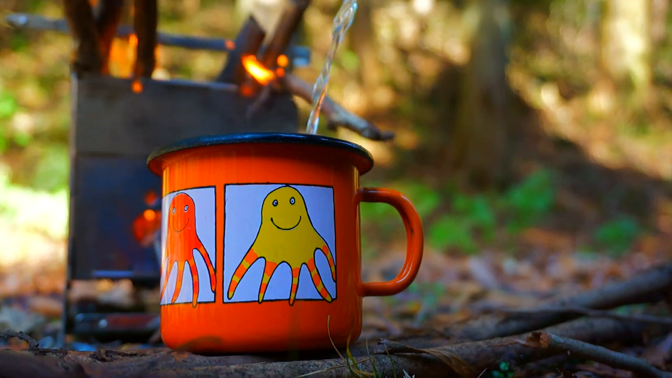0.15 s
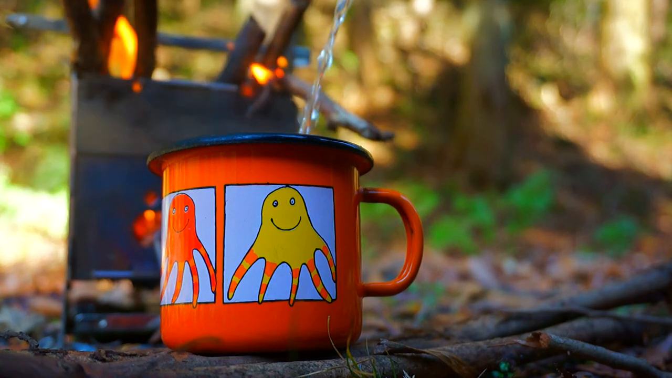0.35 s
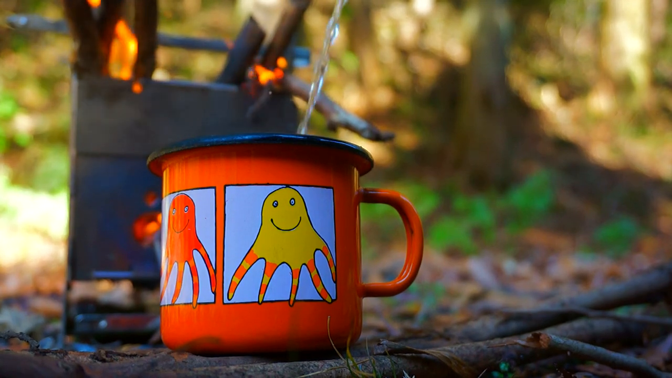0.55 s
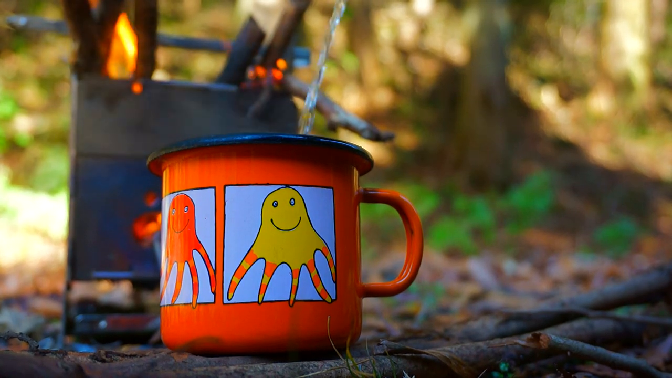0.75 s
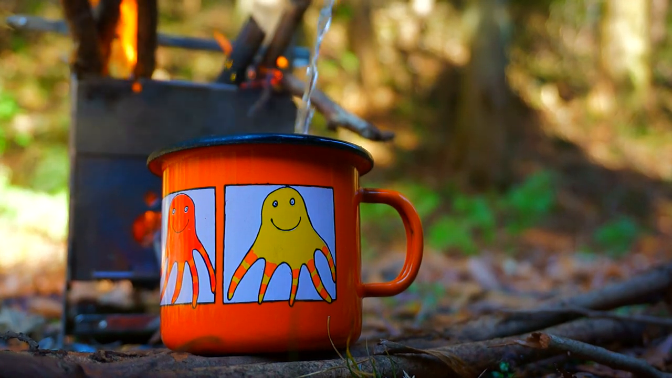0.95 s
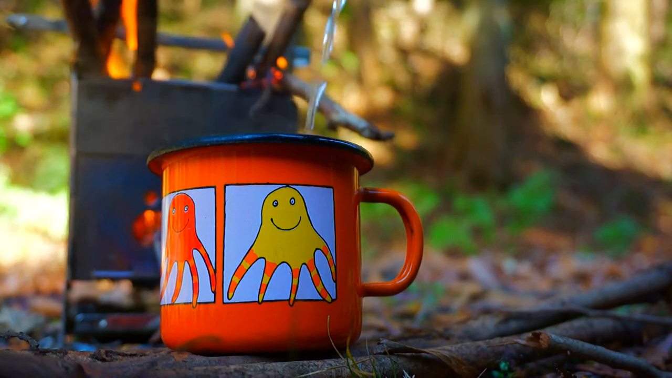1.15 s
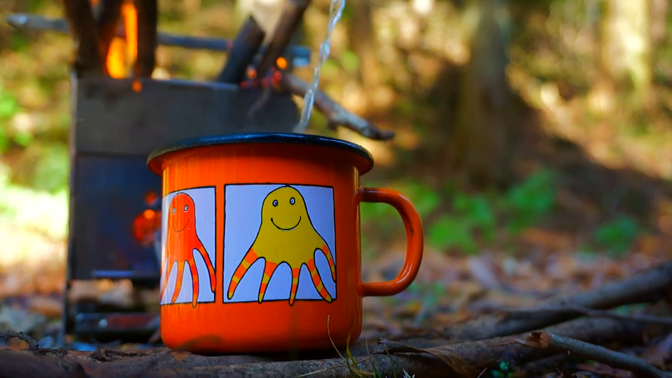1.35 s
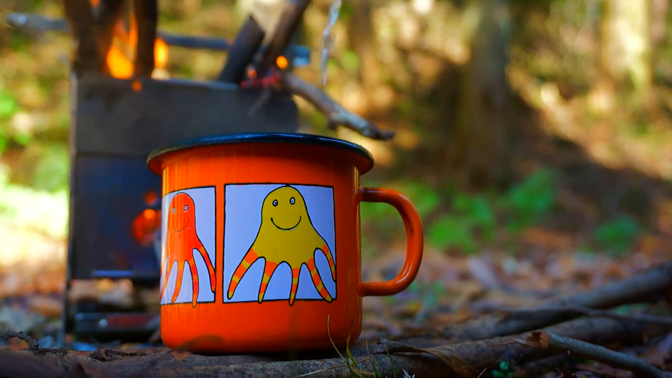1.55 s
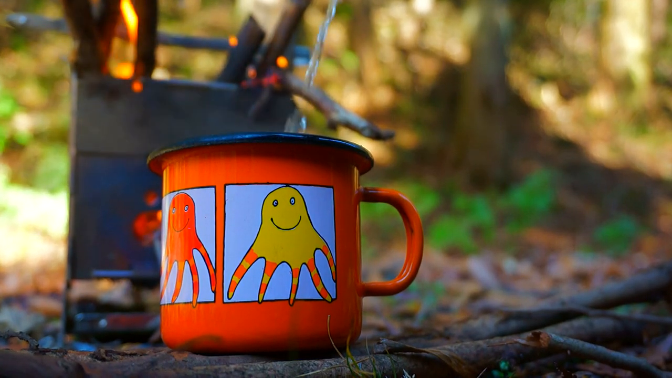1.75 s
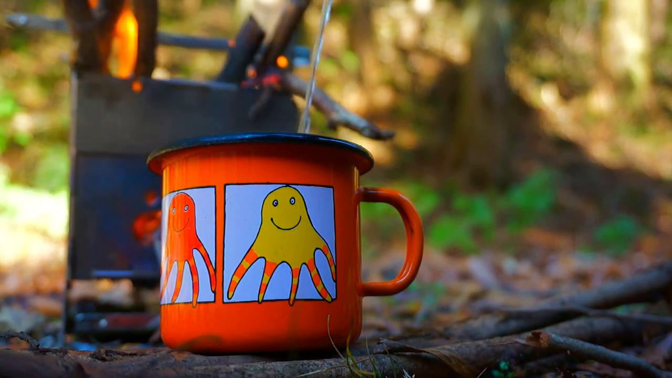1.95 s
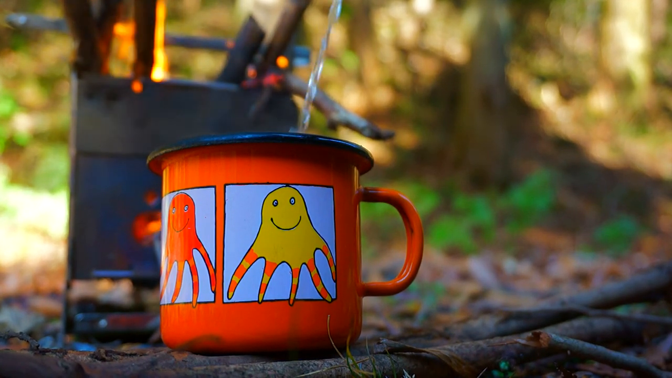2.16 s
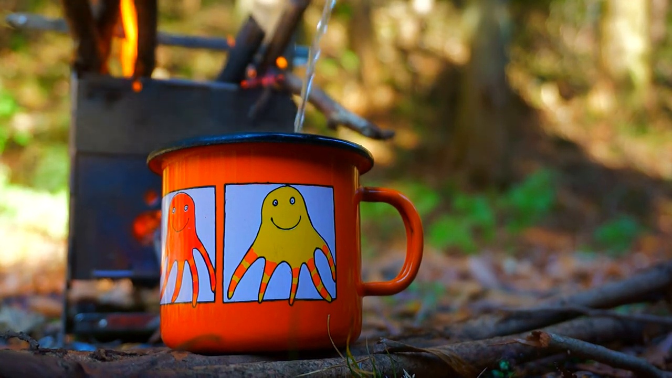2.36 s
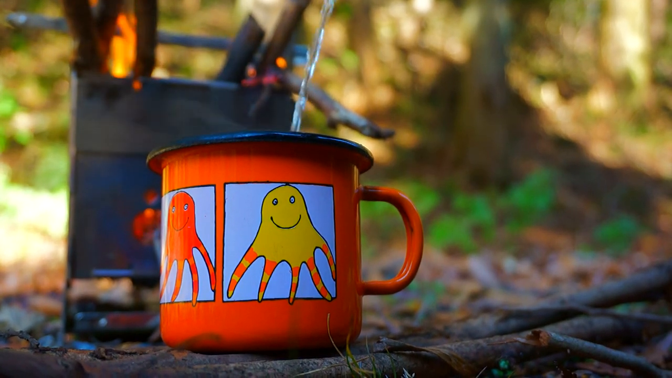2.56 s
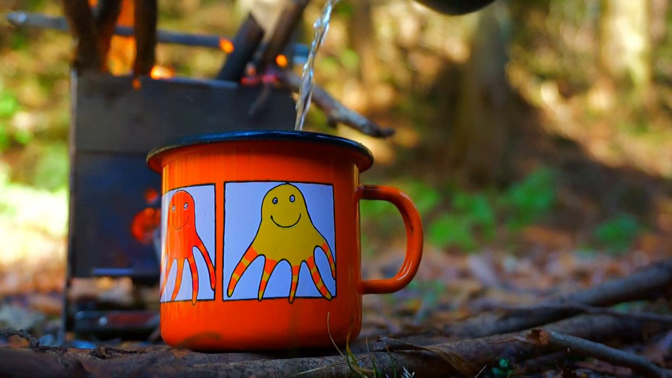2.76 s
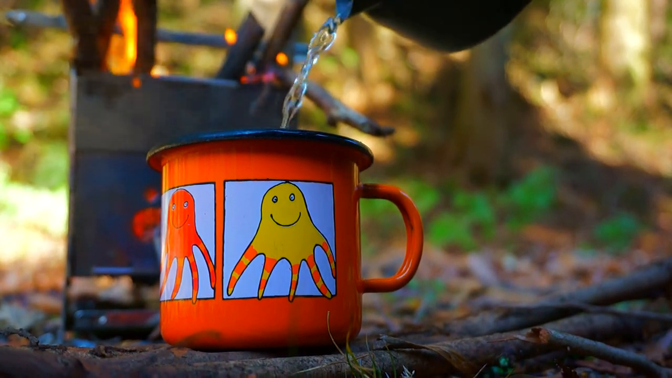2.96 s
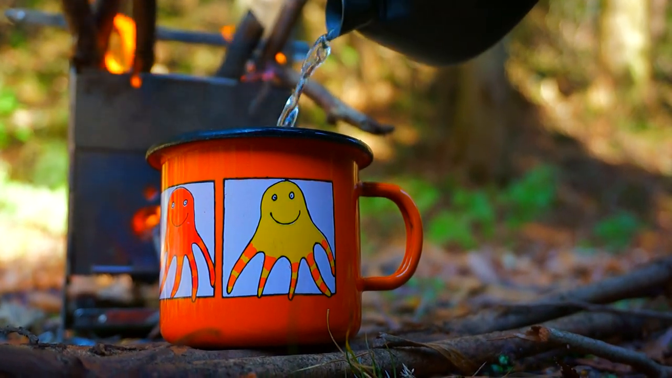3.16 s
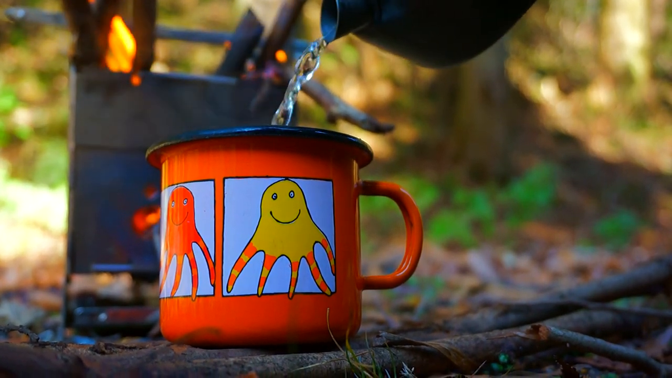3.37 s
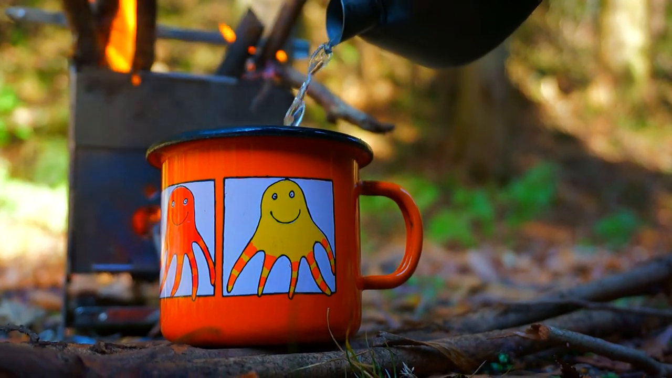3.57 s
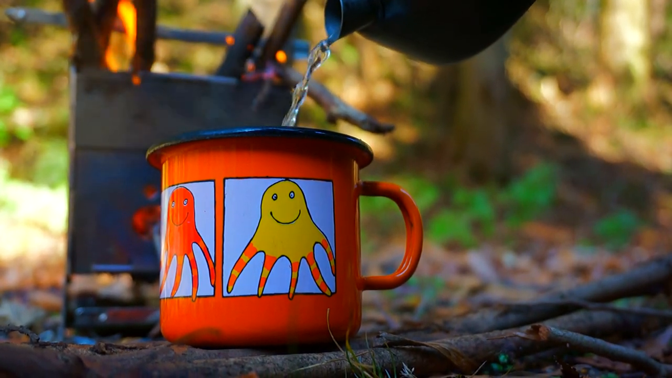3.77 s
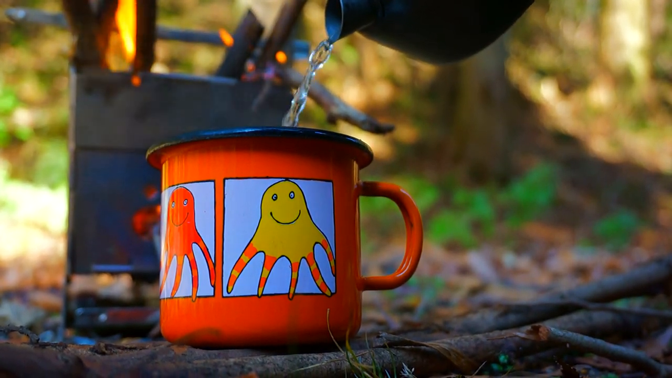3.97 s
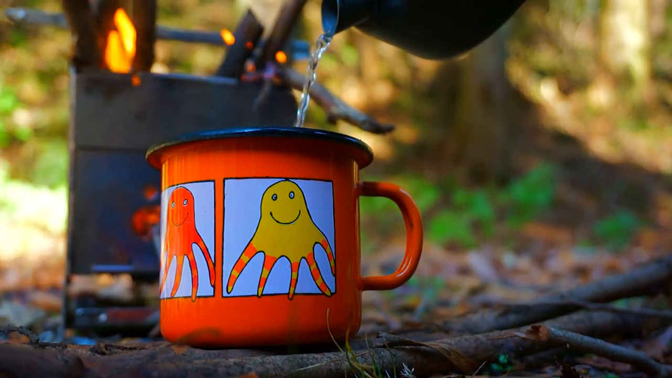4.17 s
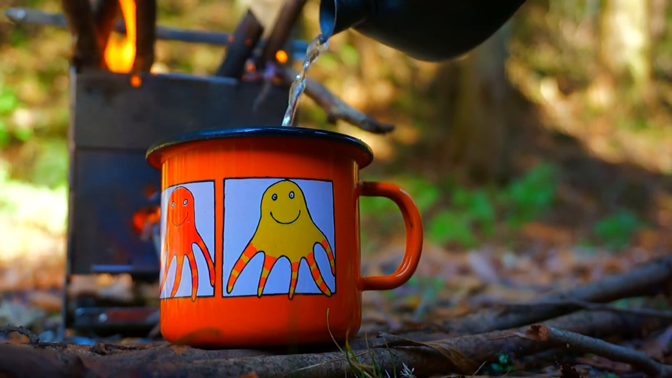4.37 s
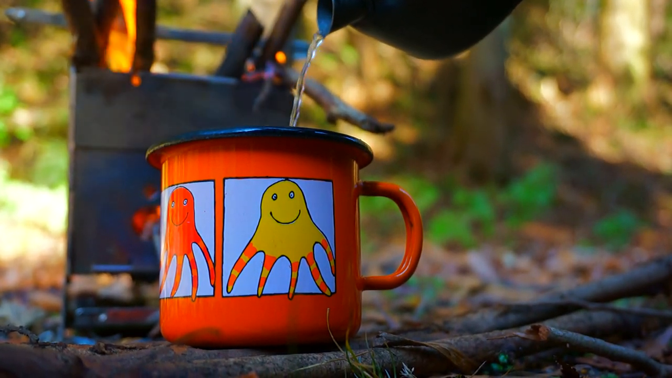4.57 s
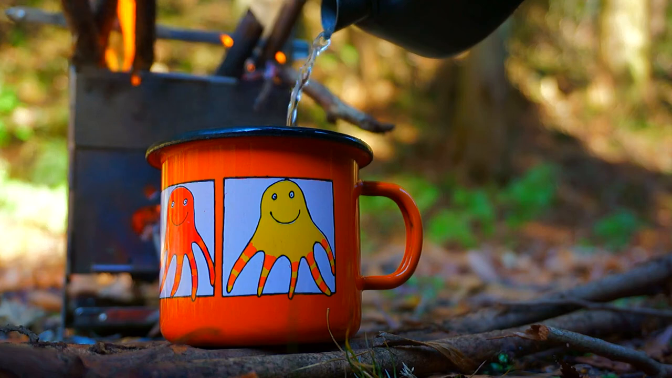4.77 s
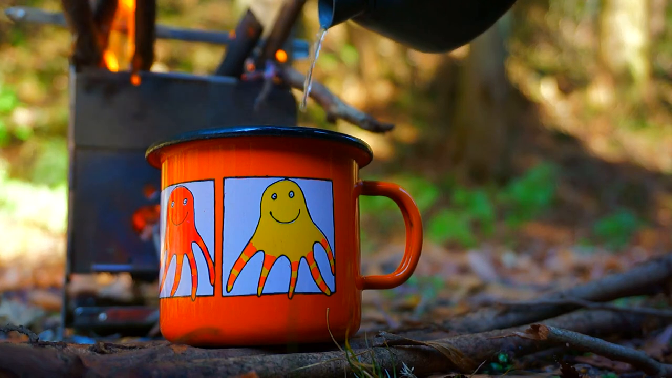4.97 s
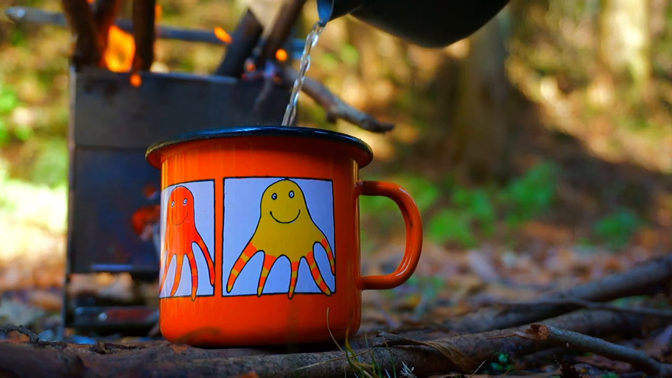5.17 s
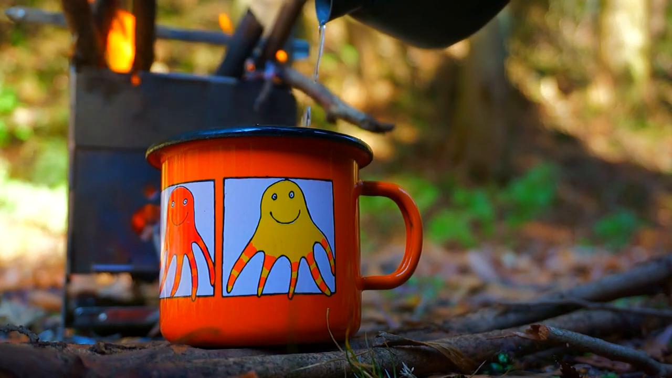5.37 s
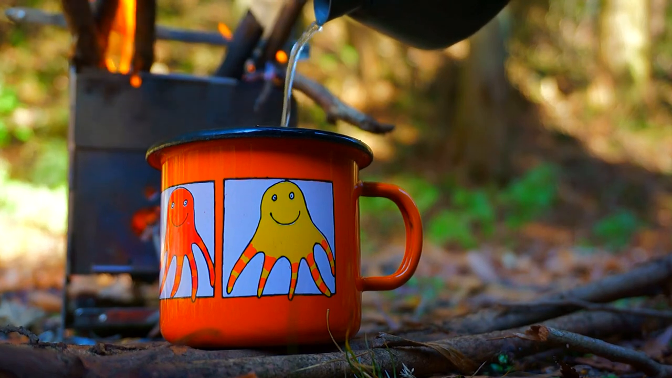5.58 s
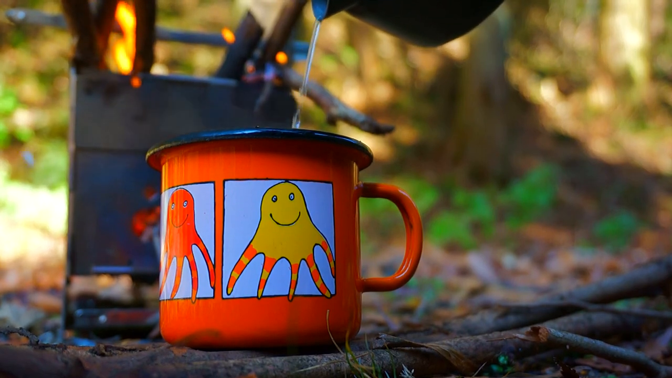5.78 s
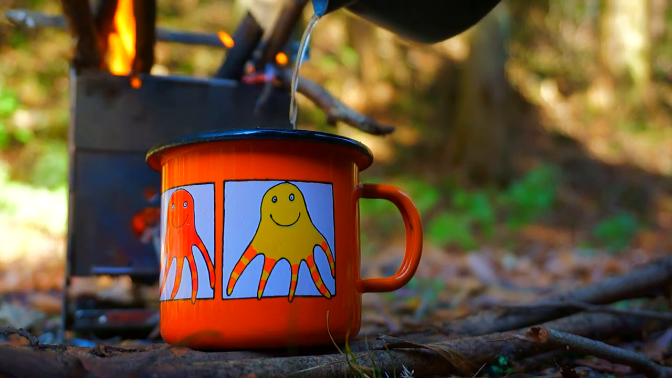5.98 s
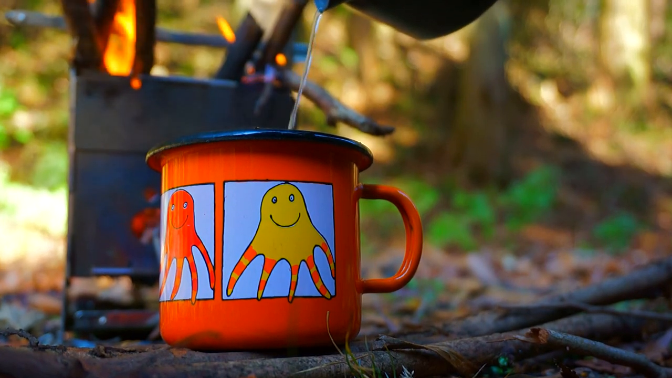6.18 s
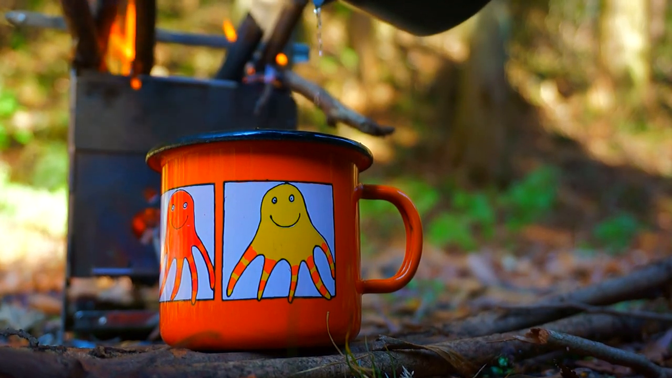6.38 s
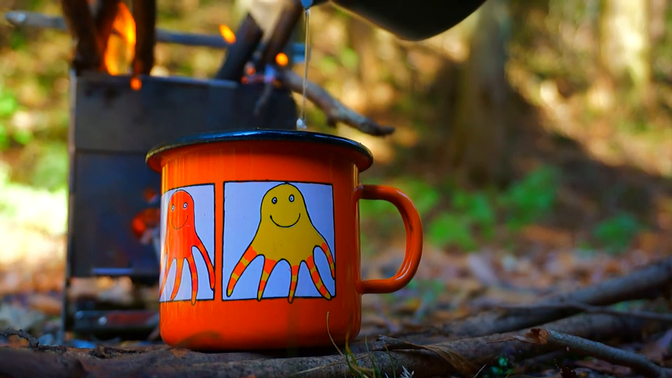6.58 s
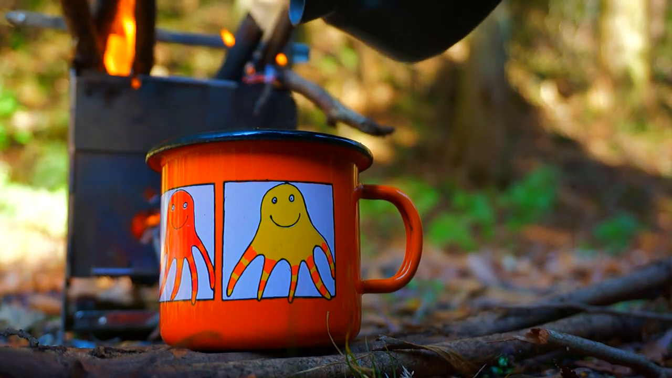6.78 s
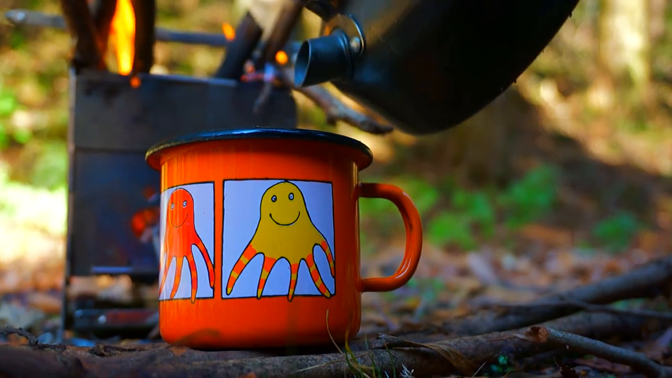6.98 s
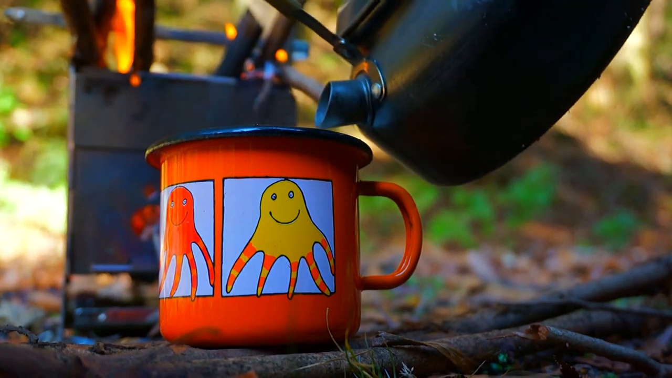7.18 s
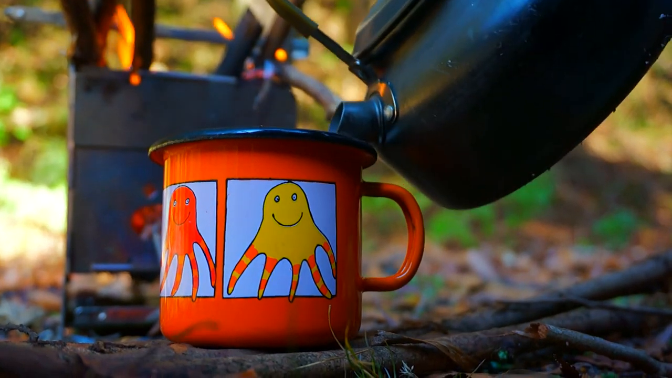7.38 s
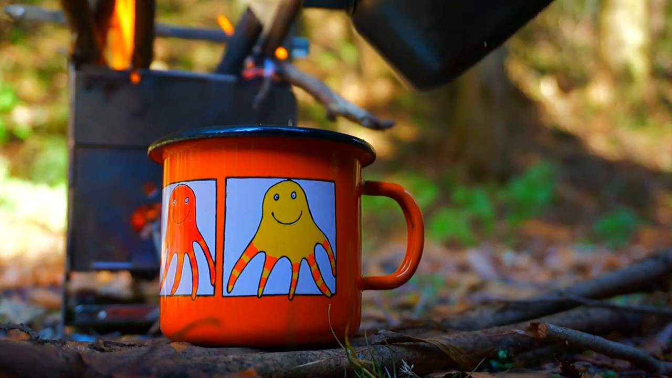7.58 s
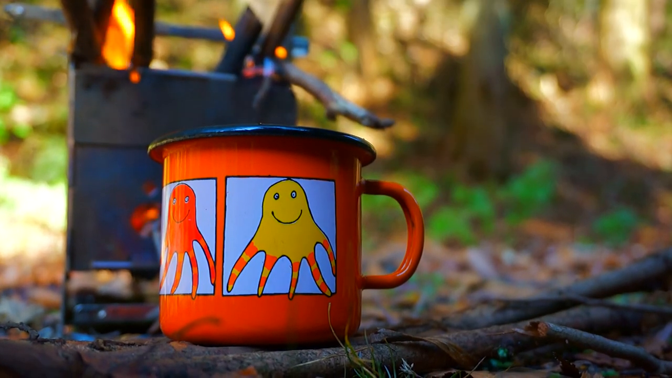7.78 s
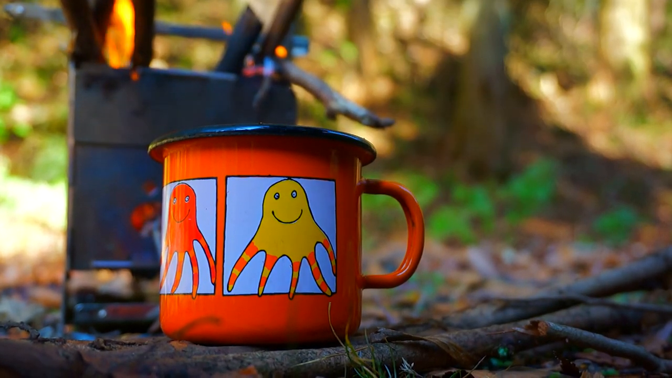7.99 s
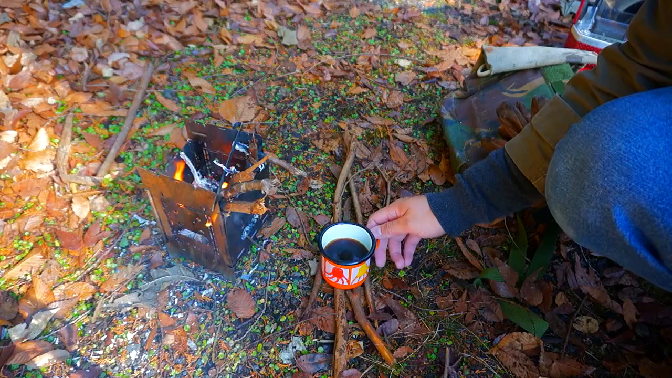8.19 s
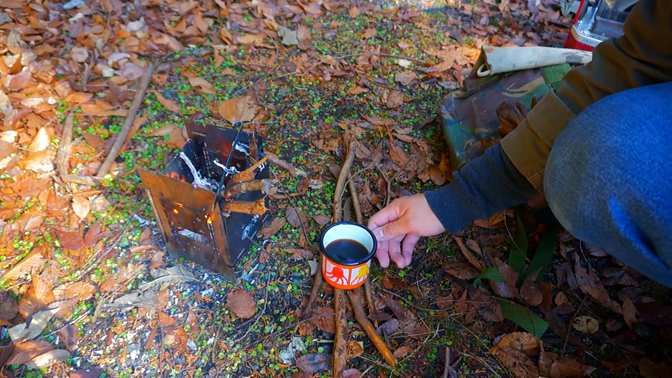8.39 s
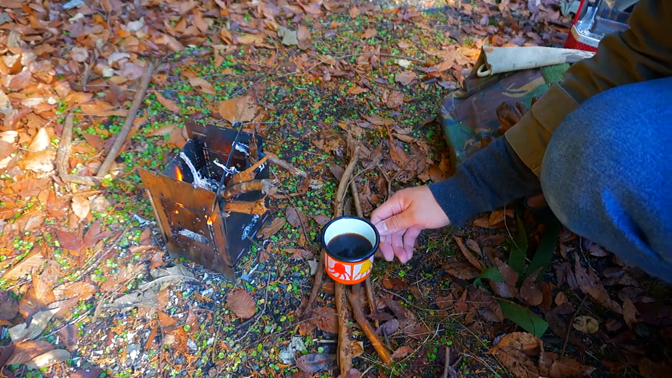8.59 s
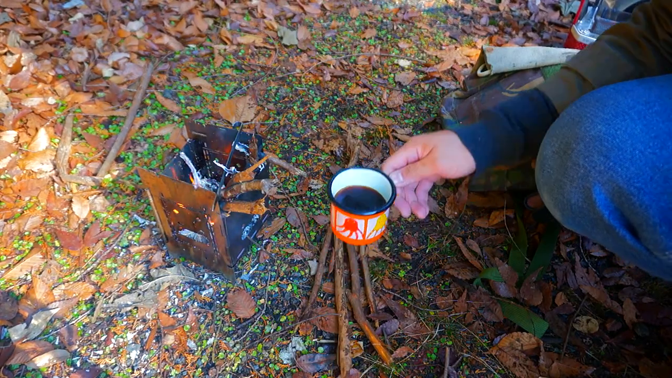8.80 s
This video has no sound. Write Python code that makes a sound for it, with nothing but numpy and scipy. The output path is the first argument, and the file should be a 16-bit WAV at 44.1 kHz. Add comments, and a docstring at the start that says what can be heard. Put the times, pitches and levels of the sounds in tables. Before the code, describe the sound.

From the start, hot water runs into an enamel mug, heard close and slightly left: dense irregular gurgles, hollow plops and bright splashing droplets with a fine hiss. It is fullest until about 3 s, then softer and finer, with bubbles rising in pitch as the mug fills. Low dull bumps occur around 3.2 to 3.9 s. From 4.5 s the stream thins, breaking briefly near 5.1 s into trickles and separate, purer drops until 6.8 s. Faint hollow tones swell in the late trickle and after it. At 7.4 s the spout knocks the rim once, a short clank with a beating metallic ring that lingers toward 8 s. Sparse wood-fire cracks come near 5.4, 6.2 and 8 s over a low, wide outdoor murmur. At 8.2 s the sound cuts abruptly to quieter air, with a soft grainy rustle peaking around 8.4 s and fading.

```python
"""Hot water runs from a kettle into an enamel mug beside a small wood stove in a forest.
Each trapped bubble is a short push that rings the air in the mug; droplets are noise bursts in the same mug.
The stream thins out; hollow notes near 1.3 kHz swell in noise, and the spout knocks once in beating modes.
Fire cracks, soft bumps and shaped noise for stove and open air lie around it.
Near the end the scene changes abruptly to a quieter spot with a soft, grainy rustle of noise."""
import sys
import numpy as np
from scipy import signal
from scipy.fft import rfft, irfft
from scipy.io import wavfile

SR = 44100
rng = np.random.default_rng(int(sys.argv[2]) if len(sys.argv) > 2 else 0)


def transcribe(u):
    """Save the signal u as a 16-bit wav file named by the first command-line argument.

    u: samples, shape (n,) or (channels, n), limited to [-1, 1]; the rate is SR.
    q: integer samples, one column per channel.
    """
    v = np.clip(np.atleast_2d(u).T, -1, 1)
    q = np.round(v * 32767).astype(np.int16)
    wavfile.write(sys.argv[1], SR, q)


N = 389835
T = np.arange(N) / SR
CLANK_AT, CHANGE_AT = 7.3987, 8.222  # s: the spout knocks; the second scene takes over

# The largest bubbles. Each row: start in seconds, level in dB (rms over 10 ms), pitch in Hz.
LARGE_BUBBLES = [(0.082, -36.5, 2200), (0.2403, -29, 1630.0), (0.2919, -32.0, 1370), (0.318, -34.5, 1960.0),
                 (0.3789, -35.5, 546), (0.3975, -30.5, 928), (0.423, -31.5, 620.0), (0.4973, -32.5, 970),
                 (0.5166, -26.0, 1240), (0.5324, -38, 1010), (0.5505, -24.5, 784), (0.5996, -29.5, 910),
                 (0.6204, -38, 875), (0.6357, -27, 915), (0.6702, -33, 765), (0.7154, -32.0, 2000),
                 (0.7361, -29.0, 710), (0.7882, -29.5, 667), (0.8006, -33.5, 770.0), (0.8305, -36.5, 2010),
                 (0.898, -37.5, 770.0), (0.9993, -30.5, 532), (1.0798, -30.0, 843), (1.1369, -28, 767),
                 (1.1761, -31.5, 1650), (1.195, -34.5, 1820.0), (1.2502, -34.0, 1060.0),
                 (1.3099, -30.5, 766), (1.3266, -34.5, 664), (1.4219, -24, 1210), (1.443, -30.5, 840),
                 (1.4508, -29.5, 1050), (1.484, -29, 1720), (1.5104, -29.0, 682), (1.565, -28, 1220),
                 (1.587, -35.5, 1390), (1.6331, -33, 1380), (1.664, -32.5, 1350), (1.6818, -35, 2160),
                 (1.7819, -34.5, 800.0), (1.7948, -34, 1070), (1.8189, -37, 950.0), (1.8283, -37, 900),
                 (1.8401, -29.5, 1010), (1.9406, -34.5, 597), (1.9825, -24.5, 396), (2.0155, -34, 450.0),
                 (2.0784, -30, 656), (2.146, -30.5, 736), (2.198, -31.5, 745), (2.2184, -29.5, 1060.0),
                 (2.267, -35, 1127), (2.2925, -34.5, 960), (2.484, -33, 790), (2.5234, -29.5, 1420),
                 (2.588, -37, 720.0), (2.6074, -36, 1690.0), (2.6391, -33.0, 760), (2.6872, -32.5, 1570),
                 (2.7044, -33.5, 2820), (2.714, -39, 2600.0), (2.7286, -31.5, 2020), (2.7392, -25.5, 890),
                 (2.8473, -28, 774), (2.8626, -29, 1350), (2.9219, -32, 760), (2.9392, -34, 1150),
                 (2.9637, -38, 1620), (3.0569, -35, 840), (3.2318, -39.5, 377), (3.3988, -36, 1660),
                 (3.5272, -34, 1310), (3.7675, -44.5, 1880), (3.836, -34.0, 1700), (3.8877, -37.5, 1520.0),
                 (3.899, -39.5, 1240), (3.9195, -33, 1020), (3.9467, -43, 1280), (3.9666, -38.5, 1810),
                 (4.0373, -40.5, 1760.0), (4.0542, -38, 1580.0), (4.1627, -39.5, 1660),
                 (4.209, -37.5, 2780), (4.2344, -38.5, 2030.0), (4.2833, -31.5, 1810),
                 (4.3055, -35.0, 2240), (4.3181, -43.5, 2880), (4.3674, -39.5, 1090), (4.3899, -37, 1660),
                 (4.433, -36.5, 1700), (4.497, -33.5, 790), (4.5421, -36, 1066), (4.5869, -36.5, 1740),
                 (4.6112, -37, 2300), (4.6793, -31, 1630.0), (4.7025, -31, 1840), (4.7414, -40, 1053),
                 (4.7654, -34, 1170), (4.7852, -42.5, 1530), (4.8681, -41, 1110), (4.883, -41.5, 1690.0),
                 (4.9298, -40.5, 1370.0), (4.9826, -40.5, 860.0), (5.0685, -39.5, 980), (5.0972, -44, 1114),
                 (5.122, -44, 1680), (5.2414, -46, 1270), (5.2938, -42.5, 1400), (5.3508, -41.5, 1240),
                 (5.401, -43.5, 1130), (5.4269, -43.5, 1430), (5.4456, -38.0, 1290), (5.5014, -42, 1220),
                 (5.5318, -39, 1106), (5.591, -44.5, 2130), (5.6469, -43, 1490), (5.658, -50, 1110),
                 (5.7276, -35.5, 1220), (5.7752, -43, 1730), (5.951, -59, 1900.0), (6.1713, -42, 1390),
                 (6.2276, -35, 1415), (6.267, -46.0, 1730.0), (6.364, -47.0, 1650.0), (6.4766, -44, 1360),
                 (6.7038, -46.5, 1100), (6.7191, -42, 1080), (6.7592, -46, 1320)]
# Strength of the pour. Each row: time in seconds, bubbling level in dB, spray level in dB.
POUR_LEVELS = [(0, -42.5, -42.5), (.5, -44.5, -38.5), (1.5, -41, -39.5), (2.25, -47.5, -45.5),
               (2.72, -41, -42.5), (3.05, -42.5, -42), (3.35, -50, -55.5), (4.1, -46, -78),
               (4.6, -45.5, -48), (5.7, -46, -48.5), (6, -54, -58.5), (6.75, -47, -47)]
# The stream thins as the kettle is tipped back. Each row: time in seconds, base rate of small bubbles
# per second, of which each layer draws its own share.
BUBBLE_RATE = [(0, 347), (4.2, 303.6), (4.8, 125), (5.5, 50), (6.79, 30)]


def gain_of(db):
    """Decibels to amplitude."""
    return 10 ** (np.asarray(db) / 20)


def evened(x):
    """Scales to rms 1."""
    return x / np.sqrt(np.mean(x ** 2) + 1e-20)


def unit(x):
    """Scales to energy 1."""
    return x / np.linalg.norm(x)


def curves(rows, t):
    """Every column of a table after its times, read at the times t."""
    s, *columns = np.transpose(rows)
    return [np.interp(t, s, c) for c in columns]


def add(mix, s, sound):
    """Lays a sound into the mix at time s."""
    part = mix[max(round(s * SR), 0):][:len(sound)]
    part += sound[:len(part)]


def band(x, lo_hz, hi_hz):
    """Band-pass."""
    return signal.sosfilt(signal.butter(2, [lo_hz, min(hi_hz, SR / 2 - 1)], "band", fs=SR, output="sos"), x)


def noise(points, size=N):
    """Noise of rms 1 with a given spectrum."""
    hz, db = np.transpose(points)
    f = np.fft.rfftfreq(size, 1 / SR)
    colour = gain_of(np.interp(np.log(f + 1), np.log(hz), db))
    return evened(irfft(rfft(rng.standard_normal(size)) * colour, size))


def wander(edge_hz):
    """Slow complex noise of power 1: the drifting strength and phase of a noisy note."""
    white = rng.standard_normal(N) + 1j * rng.standard_normal(N)
    slow = signal.sosfilt(signal.butter(2, edge_hz, fs=SR, output="sos"), white)
    return slow / np.std(slow)


def in_mug(s, hz, sharpness, soft_hz, size=1024):
    """A brief ring at hz, coloured by the mug as full as it is at time s; its onset is dull above soft_hz."""
    # Resonances of the air in the mug. Each row: pitch in Hz when shallow, pitch in Hz when full,
    # width in Hz (about 5 dB down), level in dB when shallow, level in dB when full.
    air_modes = [(257, 200, 116, 9, -21), (486, 514, 148, 18, -12), (749, 796, 145, 9.5, 6.5),
                 (1157, 1146, 110, 4, 3), (1367, 1594, 252, 13, 10), (2234, 2300, 720, -7, -2.5),
                 (3446, 3480, 210, -5.5, -15.5), (4160, 4060, 130, -25, -13.5),
                 (5640, 6300, 370, -14.5, -62), (7270, 7240, 370, -21, -9.5),
                 (10800, 9700, 6200, -32.5, -18.5)]
    full_at = 4.85  # s
    hollow_hz, hollow_width_hz = 2936, 113  # a dead spot between two modes of the mug
    f = np.fft.rfftfreq(size, 1 / SR) + 1
    fill = np.clip(s / full_at, 0, 1)
    shallow_hz, full_hz, width, shallow_db, full_db = np.transpose(air_modes)[:, :, None]
    centre = shallow_hz + fill * (full_hz - shallow_hz)
    db = shallow_db + fill * (full_db - shallow_db)
    cavity = (gain_of(db) / (1 + (1.82 * (f - centre) / width) ** 2)).sum(0)
    cavity *= gain_of(-8 * np.exp(-((f - hollow_hz) / hollow_width_hz) ** 2))
    peak = 1 / np.hypot(1, sharpness * (f / hz - hz / f))
    softness = 1 / np.hypot(1, f / soft_hz)
    log_gain = np.log(cavity * peak * softness)
    circle = np.concatenate([log_gain, log_gain[-2:0:-1]])
    # minimum phase: sharp start, ringing end
    return np.fft.ifft(np.exp(np.conj(signal.hilbert(circle)))).real


def splat(s, hz, sharpness, t60):
    """A droplet bursts: a few milliseconds of noise ring in the mug, at energy 1."""
    t = np.arange(SR // 100) / SR
    burst = rng.standard_normal(len(t)) * gain_of(-60 * t / t60) * (1 - np.exp(-t / 0.0004))
    return unit(signal.fftconvolve(burst, in_mug(s, hz, sharpness, soft_hz=19300)))


def bubble(s, hz, purity):
    """A bubble pinches off with one sharp push that rings the mug, a splash and a rising tail; rms 1 over 10 ms."""
    # The splash weakens as the water deepens. Each row: time in seconds, level in dB against the
    # ring for a bubble of middling purity.
    splash_level = [(0.8, -12.5), (3, -20)]
    splash_range_db = 14  # the messiest bubbles splash this much more than the purest
    calm_from_s, calm_after_s = 5.13, 0.75  # the surface starts to settle; time it takes
    # the tail bends upward as the bubble nears the surface: level at full purity, decay, rise in pitch
    glide_db, glide_cycles, glide_rise_per_s = -10, 9.7, 9.1
    calm = np.clip((s - calm_from_s) / calm_after_s, 0, 1)
    # single drops on calm water ring purer
    ring = unit(in_mug(s, hz, sharpness=1.0 + 1.3 * purity + 7.6 * calm, soft_hz=6000, size=2048))
    splash_db = curves(splash_level, s)[0] + splash_range_db * (.5 - purity)
    add(ring, 0, gain_of(splash_db) * splat(s, 7000, sharpness=1.13, t60=0.014))
    t = np.arange(len(ring)) / SR
    turns = hz * t * (1 + .5 * glide_rise_per_s * t)
    tail = unit(np.sin(2 * np.pi * turns) * np.exp(-turns / glide_cycles) * (1 - np.exp(-turns / 2)))
    return unit(ring + purity * gain_of(glide_db) * tail) * np.sqrt(SR / 100)


def bubble_hz(s):
    """The usual pitch of a bubble at time s: deeper water traps smaller, higher bubbles."""
    # Each row: time in seconds, pitch in Hz.
    usual_pitch = [(1.9, 955), (3.3, 1270), (4.2, 1550), (6.7, 1680)]
    return curves(usual_pitch, s)[0]


def flow(s):
    """Base rate of small bubbles per second at the times s; none while the stream is broken or after it ends."""
    # The thin stream breaks off. Each row: from seconds, to seconds; a row that runs backward makes no gap.
    gaps = [(5.135, 5.235), (5.8, 5.1)]
    unbroken = np.all([(s < start) | (s > end) for start, end in gaps], axis=0)
    return curves(BUBBLE_RATE, s)[0] * ((s < BUBBLE_RATE[-1][0]) & unbroken)


def scatter(share, spread_db):
    """Random moments at a share of the bubble rate, each with an amplitude and a normal draw for pitch."""
    s = T[rng.random(N) < share * flow(T) / SR]
    size, octave = rng.standard_normal((2, N))[:, :len(s)]
    return zip(s, gain_of(spread_db * np.minimum(size, 1.5)), octave)


def lull_db(s):
    """Level change near a large bubble, which uses up the trapped air and leaves smaller ones weak."""
    deepest_db, reach_s = -6, 0.014
    gap = abs(np.transpose(LARGE_BUBBLES)[0] - s).min()
    return deepest_db * np.exp(-(gap / reach_s) ** 2)


def plops():
    """The largest bubbles stand out one by one, each ringing the mug with its own purity."""
    out = np.zeros(N)
    for (s, db, hz), purity in zip(LARGE_BUBBLES, rng.random(len(LARGE_BUBBLES))):
        add(out, s, gain_of(db) * bubble(s, hz, purity))
    return out


def gurgle(count=186):
    """While it runs full, the stream beads up and traps middling bubbles at a loose pace."""
    pinch_s, pinch_share = .024, .8  # interval; share of intervals that pinch off a bubble
    spread_db, spread_octaves = 3.5, 0.48  # scatter of level and pitch
    out = np.zeros(N)
    chance = rng.random((count, 3))
    scatters = np.clip(rng.standard_normal((count, 2)), -1.6, 1.6)
    for k, ((late, luck, purity), (size, octave)) in enumerate(zip(chance, scatters)):
        s = (k + late) * pinch_s
        if luck < pinch_share:
            db = curves(POUR_LEVELS, s)[0] + spread_db * size + lull_db(s)
            add(out, s, gain_of(db) * bubble(s, bubble_hz(s) * 2 ** (spread_octaves * octave), purity))
    return out


def after_ring(x):
    """Two lightly damped modes of the mug pick up the bubbles, more so as the water gets deep and calm."""
    # Each row: pitch in Hz, relative level in dB, t60 in seconds.
    damped_modes = [(1197.6, 3.5, 0.17), (1525, -9, 0.35)]
    t = np.arange(SR // 5) / SR
    modes = np.zeros(len(t))
    for hz, db, t60 in damped_modes:
        per_sample = 2 * np.log(1000) / (t60 * SR)  # evens out long and short modes
        modes += gain_of(db - 60 * t / t60) * np.cos(2 * np.pi * hz * t) * per_sample
    drive_db = np.interp(T, [2, 4.5, 5.5], [-12, -3, 3])
    return signal.fftconvolve(x * gain_of(drive_db), modes)[:N]


def fizz():
    """Small bubbles crowd between the large ones, thinning out and weakening with the stream."""
    over_pour_db, thin_db = 6.5, -9.5  # over the bubbling level; change as the flow falls toward nothing
    out = np.zeros(N)
    for s, size, octave in scatter(0.95, spread_db=13.0):
        hz = 0.93 * bubble_hz(s) * 2 ** (0.69 * octave)
        ring = unit(in_mug(s, hz, sharpness=5.4, soft_hz=5700))
        thinning_db = thin_db * (1 - flow(s) / BUBBLE_RATE[0][1])
        db = curves(POUR_LEVELS, s)[0] + over_pour_db + thinning_db + 0.28 * lull_db(s)
        add(out, s, size * gain_of(db) * ring)
    return out


def prickle(hz=3900, octaves=0.3):
    """The stream's beads trap a crowd of tiny, bright bubbles that burst and keep the air in the mug sounding."""
    # Each row: time in seconds, level in dB.
    bead_levels = [(1.5, -73), (2.3, -32.5), (2.5, -43.5), (3.5, -46.5), (3.75, -38), (4.25, -38.5),
                   (4.7, -48)]
    out = np.zeros(N)
    for s, size, octave in scatter(0.86, spread_db=10.5):
        burst = splat(s, hz * 2 ** (octaves * octave), sharpness=5.0, t60=0.0065)
        add(out, s, size * gain_of(curves(bead_levels, s)[0] + lull_db(s)) * burst)
    return out


def spray():
    """Droplets burst in the mug: a few loud snaps and many fine ones, each with its own pitch."""
    # The sharpest bursts on the water and the wall. Each row: start in seconds, peak in dB, pitch in Hz.
    sharp_snaps = [(0.3973, -24, 8540), (0.4182, -23, 9600), (0.551, -29, 8150), (0.6008, -20.5, 7400),
                   (0.7146, -25, 4500), (0.7361, -29, 5480), (0.8327, -23, 8450), (0.8977, -26.5, 4650),
                   (1.0799, -28, 6840), (1.2501, -25, 5200), (1.3482, -27.5, 3300), (1.7183, -22, 8010),
                   (1.78, -27.5, 6460), (1.8187, -24, 7150), (2.3345, -25, 4250), (3.0409, -32.5, 9200)]
    out = np.zeros(N)
    for s, db, hz in sharp_snaps:
        snap = splat(s, hz, sharpness=6.3, t60=0.012)
        add(out, s, gain_of(db) * snap / abs(snap).max())
    for s, size, octave in scatter(0.9, spread_db=13.5):
        fine = splat(s, 5800 * 2 ** (0.79 * octave), sharpness=4.7, t60=0.01)
        add(out, s, size * gain_of(curves(POUR_LEVELS, s)[1]) * fine)
    return out


def froth():
    """The stream churns up a fine, flickering hiss, strongest while the mug is shallow."""
    mug_ring = in_mug(0.97, 4400, sharpness=0.22, soft_hz=12100)
    hiss = evened(signal.fftconvolve(rng.standard_normal(N), mug_ring)[:N])
    flicker = evened(band(rng.standard_normal(N), 2.3, 43))
    db = np.interp(T, [0, 1.1, 2.2, 4.5, 5.8], [-52.5, -58.5, -77.5, -62.5, -78.5])
    return hiss * (T < BUBBLE_RATE[-1][0]) * gain_of(db + 8.4 * flicker)


def hollow_notes():
    """Hollow notes near 1.3 kHz, as of air ringing in a vessel, swell and die away over a wider band of noise."""
    # Each row: start in seconds, time until the release in seconds, level in dB before note and
    # wide band are balanced, pitch in Hz, width in Hz (sets the blur of the note).
    swells = [(1.653, 0.55, -48.5, 1286, 218), (5.924, 0.77, -49, 1269, 50), (6.973, 0.3, -53.5, 1253, 215),
              (7.62, 0.41, -55, 1447, 183)]
    attack_s, release_db_per_s = 0.11, 46
    steady, restless, out = wander(edge_hz=20.0), wander(edge_hz=106), np.zeros(N)
    wide_band = evened(band(band(rng.standard_normal(N), 1074, 1630), 1074, 1630))
    for start, length, db, hz, width in swells:
        blur = np.clip((width - 45) / 200, 0, 1)
        drift = np.sqrt(1 - blur) * steady + np.sqrt(blur) * restless
        note = evened((drift * np.exp(2j * np.pi * hz * T)).real)
        release_db = release_db_per_s * np.maximum(T - start - length, 0)
        swell = np.clip((T - start) / attack_s, 0, 1) * gain_of(db - release_db)
        out += swell * (gain_of(-3.0) * note + gain_of(-6 + 2.4 * blur) * wide_band)
    return out


def clank():
    """The spout chatters on the rim for a moment and the metal rings in close, beating modes."""
    # The struck metal of kettle and mug. Each row: pitch in Hz, relative level in dB, t60 in seconds.
    metal_modes = [(706, -8.5, 0.36), (750, 6, 0.068), (1078, -5.5, 0.19), (1533, 0, 0.066),
                   (2366, -14, 0.12), (3330, -24, 0.26), (3780, -10, 0.14), (4480, -24, 0.28),
                   (4960, -5.5, 0.13), (5320, -7, 0.12)]
    # Spectrum of the chatter. Each row: frequency in Hz, relative level in dB per Hz.
    chatter_spectrum = [(150, -27), (240, -6), (380, -15.5), (740, -4), (1300, -20), (2000, -16.5),
                        (4300, -24), (5200, -16), (6000, -19.5), (15500, -26)]
    slosh = 0.014  # moving water bends the pitch of the modes by this share (rms)
    t, out = np.arange(SR) / SR, np.zeros(N)
    ring = np.zeros(SR)
    for (hz, db, t60), (phase, split) in zip(metal_modes, rng.random((len(metal_modes), 2))):
        fall = gain_of(-60 * t / t60)
        bend = evened(band(rng.standard_normal(SR), 4.5, 60))
        turns = hz * np.cumsum(1 + slosh * bend) / SR
        # the metal is not quite round: each mode has a sharper twin that dies sooner and beats with it
        twin = .7 * fall ** 2 * np.sin(2 * np.pi * turns * (1.01 + .02 * split))
        ring += gain_of(db) * (fall * np.sin(2 * np.pi * (turns + phase)) + twin)
    rattle = noise(chatter_spectrum, size=SR) * gain_of(-60 * t / 0.11)
    onset = 1 - np.exp(-t / 0.0016)
    add(out, CLANK_AT, (gain_of(-25.5) * ring + gain_of(-25.0) * rattle) * onset)
    return out


def linger(depth=.13):
    """One mode of the mug swells after the knock and outlasts the others; its level flutters fast and irregularly."""
    hz, db, t60, swell_s = 1553, -18.5, 0.63, 0.12
    t, out = np.arange(SR) / SR, np.zeros(N)
    flutter = 1 + depth * evened(band(rng.standard_normal(SR), 47, 87))
    level = gain_of(db - 60 * t / t60) * (1 - np.exp(-t / swell_s))
    add(out, CLANK_AT, level * flutter * np.sin(2 * np.pi * hz * t))
    return out


def cracks():
    """Burning sticks crack in the stove: short, fast-dying bursts of band-passed noise."""
    # Each row: start in seconds, peak in dB, nominal pitch in Hz, t60 in seconds.
    fire_bursts = [(5.351, -31.5, 4150, 0.017), (6.173, -36.5, 2300, 0.0098), (6.309, -37.5, 8500, 0.0067),
                   (7.9542, -33, 7640, 0.021), (8.0445, -36.5, 1470, 0.019)]
    t, out = np.arange(SR // 10) / SR, np.zeros(N)
    for s, db, hz, t60 in fire_bursts:
        burst = band(rng.standard_normal(len(t)) * gain_of(-60 * t / t60), hz * 0.48, hz * 1.4)
        add(out, s, gain_of(db) * burst / abs(burst).max())
    return out


def bumps():
    """Soft, dull pushes: a low sine that swells and dies within a few cycles."""
    # Each row: start in seconds, peak in dB, pitch in Hz.
    soft_pushes = [(3.232, -35, 172), (3.639, -32, 70.4), (3.935, -33, 156), (6.371, -32.5, 176)]
    out = np.zeros(N)
    for s, db, hz in soft_pushes:
        turns = hz * np.arange(SR // 4) / SR
        push = turns * np.exp(-turns / 0.31) * np.sin(2 * np.pi * turns)
        add(out, s, gain_of(db) * push / abs(push).max())
    return out


def surroundings(x, t60):
    """Weak scatter from the stove, the ground and the trees: a short decaying noise tail."""
    t = np.arange(SR // 3) / SR
    tail = band(rng.standard_normal(len(t)), 810, 4800) * gain_of(-60 * t / t60) * (t > .002)
    return signal.fftconvolve(x, unit(tail))[:N]


def air():
    """Low, lumpy murmur and faint hiss of the stove and the open air, from shaped noise."""
    # Each row: frequency in Hz, relative level in dB per Hz.
    air_spectrum = [(20, -10.5), (70, -0.5), (170, 0), (300, -7.5), (470, -18.5), (1000, -19.5),
                    (2200, -28.5), (7000, -30.5), (13800, -30), (15000, -53)]
    # Each row: time in seconds, level of the low murmur in dB before a trim of 3.5 dB.
    murmur_level = [(0, -49), (3.5, -49.5), (8.2, -52)]
    wash = noise(air_spectrum)
    murmur = band(wash, 44, 264)
    lumps = gain_of(2.24 * evened(band(rng.standard_normal(N), 1.56, 11)))
    lumpy = (wash + (lumps - 1) * murmur) / np.std(murmur)
    return gain_of(curves(murmur_level, T)[0] - 3.5) * lumpy


def quiet_spot():
    """Still air as shaped noise, and a short rustle of grainy noise like a hand among dry leaves."""
    # Each row: frequency in Hz, relative level in dB per Hz.
    still_spectrum = [(20, -17), (60, 2.5), (260, -1), (500, -15.5), (1500, -23), (2700, -19.5),
                      (13000, -22.5), (14500, -36)]
    # Each row: time in seconds, rustle level in dB before a trim of 8 dB.
    rustle_level = [(8.24, -62), (8.38, -52), (8.58, -61), (8.84, -64.5)]
    grains = gain_of(1.6 * evened(band(rng.standard_normal(N), 17, 300)))
    rustle = evened(band(rng.standard_normal(N) * grains, 470, 2700))
    return gain_of(-61.5) * noise(still_spectrum) + gain_of(curves(rustle_level, T)[0] - 8.0) * rustle


def scene():
    """Pour and knock are close, slightly to the left; the air is wide in its middle range; then the quiet spot."""
    bubbles = plops() + gurgle()
    near = bubbles + after_ring(bubbles) + fizz() + prickle() + spray() + froth() + cracks() + hollow_notes()
    knock, note = clank(), linger()
    mid = near + knock + note + gain_of(-27.5) * surroundings(near, t60=0.11) + air() + bumps()
    side = 0.058 * near + 0.07 * knock + 0.11 * note
    side += gain_of(-20) * surroundings(near + knock, t60=0.077)
    side += band(gain_of(-9) * air(), lo_hz=238, hi_hz=5500)
    first = np.array([mid + side, mid - side]) * (T < CHANGE_AT)
    still, wide = quiet_spot(), gain_of(-9.5) * quiet_spot()
    # a hard cut, 12 ms of silence, then a quick fade-in
    fade_in = np.clip((T - CHANGE_AT - .012) / 0.0098, 0, 1)
    return first + np.array([still + wide, still - wide]) * fade_in


def record(dry):
    """A steep low-pass closes the top of the treble."""
    edge_hz = 15300
    low_pass = signal.firwin(255, edge_hz, window=("kaiser", 9), fs=SR)
    return signal.oaconvolve(dry, low_pass[None], "same")


dry = scene()
out = record(dry)
transcribe(out)
```